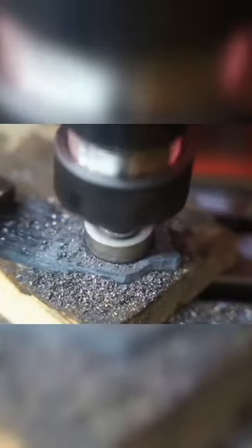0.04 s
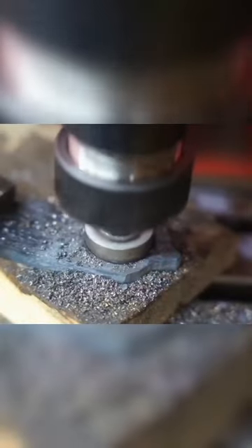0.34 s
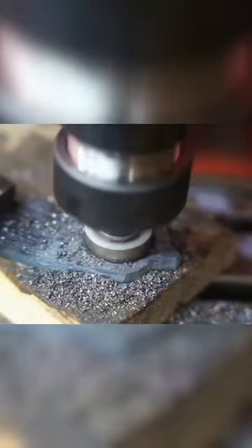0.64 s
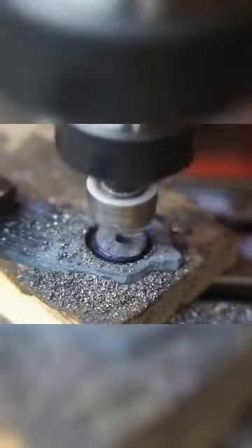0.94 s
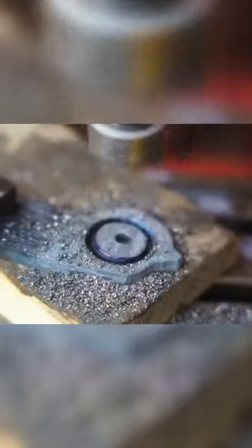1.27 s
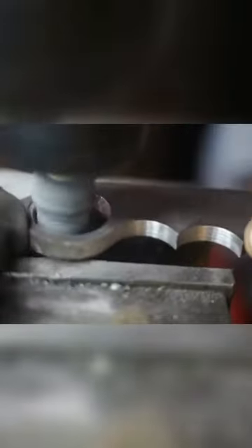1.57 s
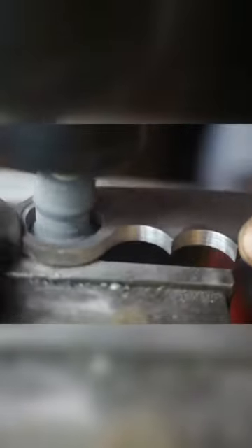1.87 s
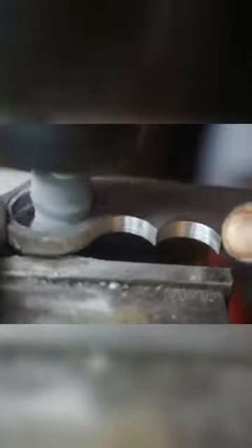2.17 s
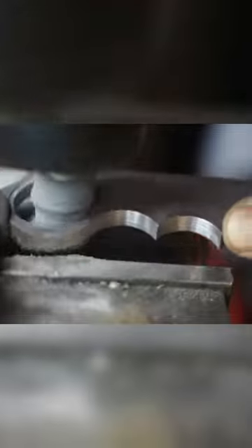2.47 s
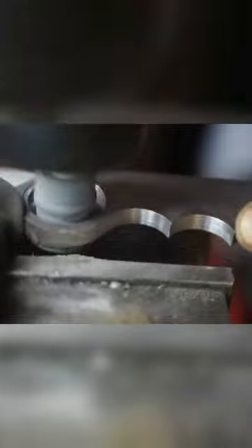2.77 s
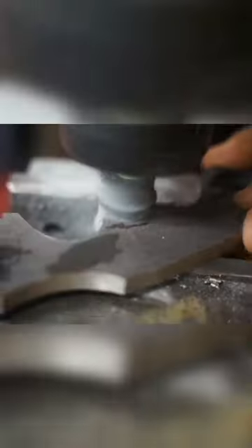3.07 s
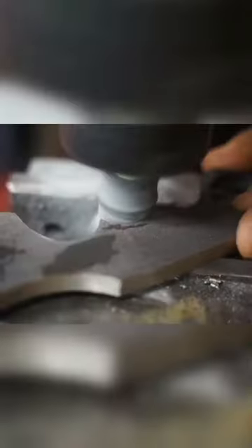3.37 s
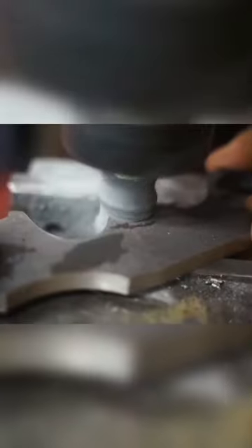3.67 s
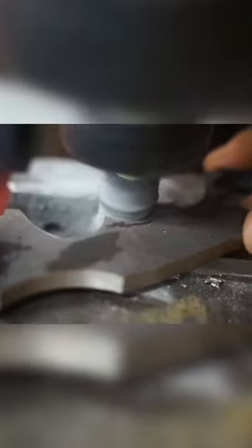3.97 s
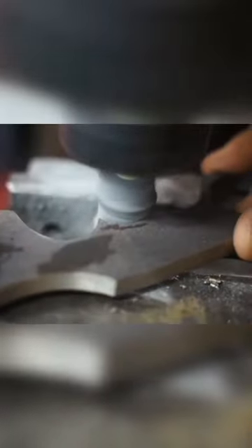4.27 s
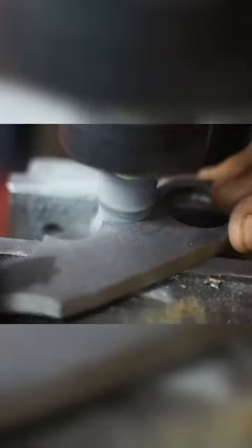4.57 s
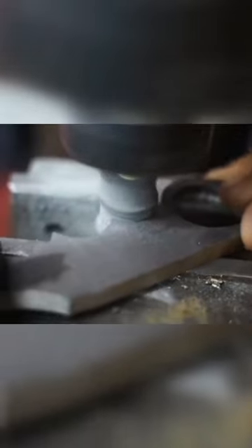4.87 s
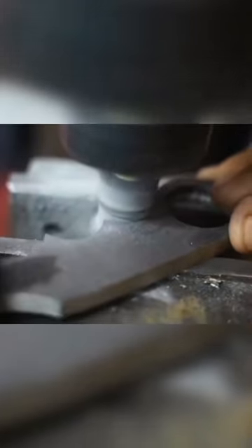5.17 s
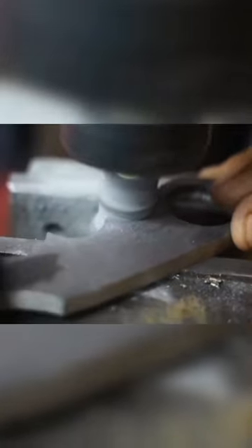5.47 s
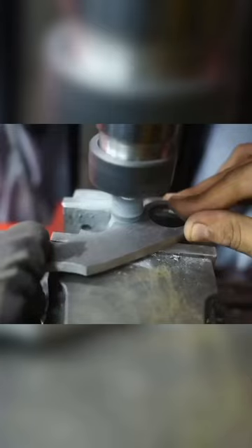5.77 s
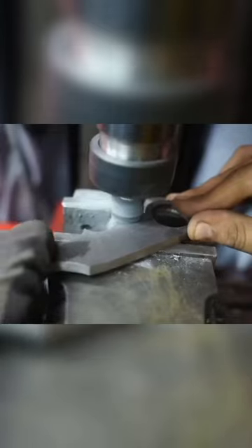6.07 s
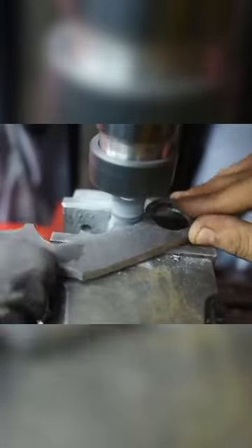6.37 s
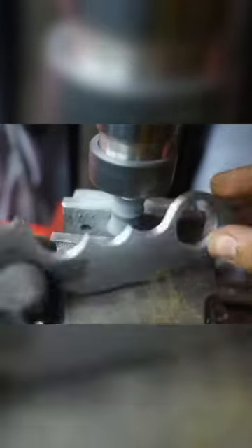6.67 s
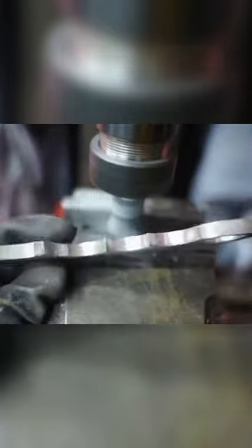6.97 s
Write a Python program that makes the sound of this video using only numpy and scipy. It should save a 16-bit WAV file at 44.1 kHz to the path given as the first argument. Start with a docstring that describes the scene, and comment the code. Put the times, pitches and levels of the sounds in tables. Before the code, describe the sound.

A hole saw grinds through steel and squeals free, then a sanding drum on a drill press rubs and chatters against a ringing blade.

```python
"""Hole saw and sanding drum

Close up at a drill press in a small shop. A hole saw squeaks, grinds through a steel blank and
squeals by stick-slip as it lifts; the press idles for a moment. Then a sanding drum grinds a blade's
edge: the steel sings under the grit and chatters as the drum's high spot strikes it once a turn."""
import sys
import numpy as np
from scipy import signal
from scipy.fft import rfft, irfft
from scipy.io import wavfile
from scipy.ndimage import uniform_filter1d

SR = 44100
rng = np.random.default_rng(int(sys.argv[2]) if len(sys.argv) > 2 else 0)


def file_out(sig):
    """Save sig as 16-bit WAV at sys.argv[1]."""
    # one column per channel
    cols = np.atleast_2d(sig).T
    # limit, then scale
    lim = np.clip(cols, -1, 1)
    pcm = np.round(lim * 32767).astype(np.int16)
    wavfile.write(sys.argv[1], SR, pcm)


N = 319284
T = np.arange(N) / SR

# Levels in the tables are relative; each layer sets its own gain.
# the saw's stick-slip in its groove:
# start/s, release/s, level at release/dB, swell/(dB/s), decay/(dB/s), f/Hz, sharp at first by/Hz
ENTRY_SQUEAK = (0, .012, -31, 0, 1200, 8785, 15)
LIFT_SQUEAL = (.944, .962, -30.5, 40, 175, 3975, 30)

# tone of the steady motor wash and of the press running free: f/Hz, level/dB
MOTOR_COLOUR = [(25, -3.5), (80, -11), (150, -4), (280, -4), (550, -4.5), (1100, -3), (3000, -7),
                (15000, -26.5)]
IDLE_COLOUR = [(25, -23), (100, -10.5), (280, 0), (520, -11), (1100, -16), (2600, -20), (3500, -39),
               (12300, -38.5), (15500, -38)]
# resonances of the idling press: f/Hz, width/Hz, level/dB
IDLE_MODES = [(1110, 93, -8.5), (1640, 60, -14), (2010, 51, -16), (4640, 150, -21)]
# the idle's rise between the jobs: t/s, level/dB
IDLE_ENVELOPE = [(.94, -58.5), (1.02, -55.5), (1.1, -63), (1.32, -57.5), (1.39, -53.5), (1.44, -55.5),
                 (1.58, -48.5)]

# the teeth bite into the blank: start/s, end/s, grind/dB, rumble/dB
BITES = [(.06, .2, -54.5, -50), (.22, .31, -39.5, -43.5), (.35, .435, -40.5, -41), (.47, .53, -42, -53),
         (.57, .71, -49.5, -49), (.74, .85, -49, -49), (.875, .905, -43, -46.5)]
# tone of the table's rumble, the blank's grind and the flying chips: f/Hz, level/dB
RUMBLE_COLOUR = [(20, -16), (70, -5.5), (140, -0.5), (290, 4.5), (450, -5), (700, -9.5), (1500, -61)]
GRIND_COLOUR = [(350, -11.5), (650, -13), (1250, -4.5), (2600, -10), (6000, -33)]
CHIP_COLOUR = [(1500, -16), (2800, -12), (3150, -1.5), (3750, -2), (4700, -6), (6500, -10), (11000, -12.5),
               (15500, -13.5)]
# resonances of the blank on its board, the saw's cup and the nearly freed disc: f/Hz, width/Hz, level/dB
BLANK_MODES = [(1050, 180, 1.5), (1700, 250, -3)]
CUP_MODES = [(3180, 110, -49), (3570, 150, -47.5), (4450, 170, -52), (6060, 96, -57)]
DISC_MODES = [(1530, 79, -52), (2310, 140, -48.5)]

# an edge snags; the work shifts on the table: t/s, level/dB, f/Hz, width/Hz, half length/s
EDGE_SNAGS = [(.128, -46.5, 3720, 450, 0.0079), (.175, -30.5, 3100, 400, .002),
              (.183, -40.5, 3800, 300, .005), (.493, -37.5, 3540, 180, 0.017), (.523, -35, 3300, 300, .008),
              (.585, -40.5, 5530, 500, 0.0088), (.625, -42, 3500, 150, .017),
              (.917, -37, 3220, 120, 0.0068), (.917, -33.5, 4080, 330, 0.0097),
              (.97, -44, 3230, 180, .0096), (1.254, -52, 10200, 2600, .003), (1.5, -57, 1700, 80, 0.032),
              (1.745, -34, 5430, 220, 0.006), (2.092, -34, 5480, 220, 0.008), (2.1, -37.5, 3790, 170, .022),
              (2.29, -51, 1110, 400, .025), (2.488, -29.5, 5490, 220, .006), (2.69, -50, 1120, 400, .035),
              (2.865, -32, 5520, 220, 0.004), (7.12, -49, 1150, 200, .035)]
TABLE_BUMPS = [(.13, -44, 250, 160, 0.018), (.79, -42.5, 131, 80, .035), (1.98, -53.5, 199, 160, 0.032),
               (3.11, -62, 180, 150, 0.037), (4.87, -62.5, 179, 161, 0.067)]
# steel touches steel: t/s, level/dB, f/Hz, t60/s, crack/dB
STEEL_TAPS = [(.687, -30, 3130, 0.018, -5), (.776, -32.5, 7600, .012, 5), (1.078, -32, 5510, 0.028, -14),
              (1.078, -42, 13250, 0.0088, 1), (1.251, -46, 3880, .02, -6), (1.548, -44, 3970, 0.019, 12.5),
              (1.566, -32.5, 5790, 0.037, 5.5), (1.572, -32.5, 2900, 0.026, -3)]
# tone of a tap's crack: f/Hz, level/dB
CRACK_COLOUR = [(150, -23), (1500, -1), (3500, 0.5), (5500, 4.5), (10500, -5.5), (15000, -16)]

# the hand leans the blade on the drum: t/s, level/dB
HAND_LEAN = [(1.6, -69), (1.68, -47), (3.45, -46), (3.66, -53.5), (4.1, -52.5), (5.79, -51), (6.22, -48.5),
             (6.36, -44.5), (7.24, -43)]
# extra pushes on top: t/s, half length/s, level/dB
HAND_PUSHES = [(1.686, 0.027, -46.5), (1.948, 0.15, -44.5), (2.298, 0.093, -46.5), (2.448, 0.029, -43),
               (2.685, 0.16, -47), (2.816, 0.025, -42.5), (3.024, 0.13, -45), (3.395, 0.023, -48),
               (3.902, 0.088, -55.5), (4.304, 0.29, -51), (4.886, 0.097, -47.5), (5.32, 0.15, -49),
               (5.55, 0.15, -45.5), (5.884, 0.047, -45.5), (5.974, 0.088, -44.5), (7.16, 0.067, -47.5)]
# spells of chatter on the high spot: start/s, end/s, knock/dB, chirp/dB
CHATTER_SPELLS = [(1.73, 1.77, -37.5, -57), (2.04, 2.11, -38.5, -56), (2.46, 2.52, -40.5, -51),
                  (2.8, 3.15, -42.5, -58), (3.26, 3.33, -38, -50), (3.48, 4.73, -36, -40.5),
                  (4.96, 5.27, -35.5, -44), (5.6, 5.83, -36, -45.5), (6.03, 6.27, -36.5, -45.5)]
# tone of the grit's rub, the table's groan, the high spot's knock, the blade's song: f/Hz, level/dB
RUB_COLOUR = [(30, -26), (120, -19.5), (230, -16), (450, -19), (750, -22), (1400, -10.5), (2000, 0),
              (3000, 5), (4200, -2), (9000, -9), (15500, -14.5)]
GROAN_COLOUR = [(500, -37), (900, -9), (1400, -15), (2500, -54)]
KNOCK_COLOUR = [(300, -56), (1200, -33), (2200, -31), (5000, 1), (7000, -3.5), (12500, -9), (15500, -9.5)]
SING_COLOUR = [(1000, -75), (2000, -57), (2700, -23), (5500, -33), (15000, -45)]
# resonances of those four layers and of the blade's finger ring: f/Hz, width/Hz, level/dB
RUB_MODES = [(1680, 105, -0.5), (2323, 130, 10), (3360, 63, 6), (3950, 96, -9), (4690, 76, 6),
             (5040, 250, 4.5)]
GROAN_MODES = [(1143, 110, -2.5), (1736, 152, 11.5)]
KNOCK_MODES = [(3090, 240, 2), (5450, 260, 6.5), (6370, 110, -6), (8250, 430, -0.5), (8700, 100, -2)]
SING_MODES = [(2641.5, 94.5, 3), (3274, 68, -8), (5110, 170, -28.5)]
FINGER_RING_MODES = [(2880, 230, -5), (3830, 120, -9.5), (5490, 150, -10)]
# overtones of the blade's stick-slip: harmonic number, level/dB
CHIRP_OVERTONES = [(2, -4), (3, 1), (4, -11)]
# the drum catches the blade hard: t/s, force/dB
HARD_CATCHES = [(2.347, -18), (3.113, -23), (3.167, -22.5), (3.309, -20), (3.426, -17), (4.01, -28),
                (4.298, -20), (4.674, -20.5), (4.783, -19.5), (4.936, -17.5)]
# the blade lands after bouncing clear for a turn: t/s
LANDINGS = [3.342, 3.665, 3.961, 4.162, 4.246, 4.279, 4.331, 4.602, 4.707, 4.78, 4.816, 5.768, 5.803, 5.836]


def amp(db):
    """Decibels to gain."""
    return np.exp(np.asarray(db) * np.log(10) / 20)


def unit(x):
    """Scales to rms 1."""
    return x / np.sqrt(np.mean(x ** 2) + 1e-20)


def held(start, end, rise, fall):
    """Envelope: a smooth attack up to start, a hold, a smooth release after end."""
    outside = np.maximum((start - T) / rise, (T - end) / fall)
    return np.exp(-np.clip(outside, 0, 6) ** 2)


def fader(rows, fade=0.014):
    """Rides the gain along (t/s, level/dB) points, fading out beyond them."""
    times, db = np.transpose(rows)
    return amp(np.interp(T, times, db)) * held(times[0], times[-1], fade, fade)


def spells(rows, rise, fall):
    """Two envelopes from rows of (start/s, end/s, level/dB, level/dB); overlaps add in power."""
    return [np.sqrt(sum((amp(row[column]) * held(row[0], row[1], rise, fall)) ** 2 for row in rows))
            for column in (2, 3)]


def wander(hz):
    """Smooth random modulation of rms 1, rolling off above hz."""
    rolloff = 1 + (np.fft.rfftfreq(N, 1 / SR) / hz) ** 4
    return unit(irfft(rfft(rng.standard_normal(N)) / rolloff, N))


def steadied(x, size=5000):
    """Keeps the fast grain of x but holds its slow level at 1."""
    power = uniform_filter1d(uniform_filter1d(x ** 2, size), size // 2)
    return x / np.sqrt(abs(power) + 1e-12)


def body(x, colour, modes=(), size=4096):
    """Plays x through a broad tone curve with resonances standing on it; comes out at rms 1."""
    hz = abs(np.fft.fftfreq(size, 1 / SR))
    points, db = np.transpose(colour)
    power = amp(np.interp(np.log(hz + 1), np.log(points), db)) ** 2
    for centre, width, mode_db in modes:
        detune = (hz ** 2 - centre ** 2) / (width * (hz + 1))
        power = power + amp(mode_db) ** 2 / (1 + detune ** 2) / (1 + (detune / 8) ** 2)
    log_gain = np.log(power + 1e-10) / 2
    response = np.fft.ifft(np.exp(np.conj(signal.hilbert(log_gain)))).real  # minimum phase: no pre-ring
    return unit(signal.oaconvolve(x, response[:size // 2])[:N])


def grit(spread_db):
    """A dense stream of tiny scratches of uneven size."""
    return unit(rng.standard_normal(N) * amp(spread_db * wander(2350)))


def ringing(drive, modes, flicker_db, flicker_hz):
    """Friction excites each mode on its own, so they take turns in standing out."""
    out = np.zeros(N)
    for hz, width, db in modes:
        mode = signal.lfilter(*signal.iirpeak(hz, hz / width, SR), drive * rng.standard_normal(N))
        out += amp(db) * steadied(mode * amp(flicker_db * wander(flicker_hz)), size=8000)
    return out


def saw_squeal(row, rough, flutter_hz, overtone_db, catch_s=0.0093, settle_s=0.024):
    """The saw's cup rings by stick-slip: rough while gripped hard, thin and pure as it comes free."""
    start, release, db, swell, decay, hz, sharp_hz = row
    gain = amp(db - swell * np.maximum(release - T, 0) - decay * np.maximum(T - release, 0))
    gain *= held(start, T[-1], catch_s, catch_s)
    pitch = hz + sharp_hz * np.exp(-np.maximum(T - start, 0) / settle_s)
    shake = rough * (gain / gain.max()) ** .4
    phase = 2 * np.pi * np.cumsum(pitch) / SR + .75 * shake * wander(flutter_hz)
    grip = steadied(1 + shake * wander(flutter_hz), size=1800)
    overtone = amp(overtone_db) * shake * np.sin(2 * phase + shake * wander(2 * flutter_hz))
    return np.sqrt(2) * gain * grip * (np.sin(phase) + overtone)


def drill_press():
    """Motor and belt: up front between the jobs, a low wash under the work."""
    idle = steadied(body(grit(2.8) * amp(2.2 * wander(67)), IDLE_COLOUR, IDLE_MODES))
    wash = body(grit(0.68), MOTOR_COLOUR)
    return idle * fader(IDLE_ENVELOPE) * amp(2.5) + wash * amp(-62.5)


def hole_saw(start_s=0.3, disc_loose_s=0.65, end_s=0.912, rise_s=0.11, fall_s=0.025):
    """Teeth catch unevenly: the table rumbles, the blank grinds, chips hiss, cup and disc ring."""
    bite = amp(1.93 * wander(22))
    teeth = amp(1.6 * wander(200))
    cutting = held(start_s, end_s, rise_s, fall_s)
    loose = cutting * held(disc_loose_s, end_s, rise_s, fall_s)
    biting, shaking = spells(BITES, rise=0.022, fall=0.017)
    grinding = np.maximum(biting, cutting * amp(-48.5))  # steady feed under the bites
    flying = cutting * (grinding / amp(-41)) ** 0.31  # a little more spray in the hard bites
    rumble = steadied(body(bite * grit(0.99), RUMBLE_COLOUR)) * shaking * amp(-2.0)
    grind = steadied(body(bite * teeth * grit(0.98), GRIND_COLOUR, BLANK_MODES)) * grinding * amp(0.5)
    chips = steadied(body(bite * teeth * grit(1.6), CHIP_COLOUR)) * flying * amp(-41)
    cup = ringing(teeth, CUP_MODES, flicker_db=4, flicker_hz=22) * flying
    disc = ringing(teeth, DISC_MODES, flicker_db=3, flicker_hz=22) * loose
    return rumble + grind + chips + cup + disc


def friction_swells(rows):
    """Snags and bumps: short swells of friction, each ringing one resonance."""
    out = np.zeros(N)
    for s, db, hz, width, half in rows:
        near = abs(T - s) < 4 * half
        band = signal.butter(2, [max(hz - width / 2, 20), hz + width / 2], "bandpass", fs=SR, output="sos")
        ring = signal.sosfilt(band, rng.standard_normal(SR))[-near.sum():]
        shape = np.exp(-.5 * ((T[near] - s) / half) ** 2)
        out[near] += amp(db) * unit(ring * shape) * np.sqrt(np.mean(shape ** 2))
    return out


def shop_reflections(x, t60=0.1, wet_db=-13, size=12000):
    """Adds a tight, diffuse room: bounces off the table, the column and the walls."""
    age = np.arange(size) / SR
    tail = rng.standard_normal(size) * (age > .004) * amp(-60 * age / t60)
    return x + amp(wet_db) * signal.oaconvolve(x, tail / np.linalg.norm(tail))[:N]


def steel_taps():
    """Each touch of steel on steel is a short crack and one ringing mode."""
    out = np.zeros(N)
    noise = body(rng.standard_normal(N), CRACK_COLOUR)
    for s, db, hz, t60, crack_db in STEEL_TAPS:
        age = np.maximum(T - s, 0)
        attack = 1 - np.exp(-age / 0.00013)
        ring = amp(-60 * age / t60) * np.sin(2 * np.pi * hz * age)
        crack = 0.43 * amp(crack_db) * noise * np.exp(-age / 0.0064)
        out += amp(db) * attack * (ring + crack)
    return out


def hand_pressure():
    """The hand's weight on the blade as a gain: a slow lean with pushes on top."""
    push_power = sum((amp(db) * held(s, s, half, half)) ** 2 for s, half, db in HAND_PUSHES)
    return np.sqrt(fader(HAND_LEAN) ** 2 + push_power)


def sanding_drum(start_s=1.66, leave_ring_s=3.16):
    """Grit rubs the blade's edge and the high spot hammers it; both make the steel sing."""
    on_drum = held(start_s, T[-1], 0.018, 0.018)
    in_ring = held(0, leave_ring_s, 0.055, 0.055)  # the drum works inside the finger ring
    blows, touching = high_spot()
    pressure = unit(amp(1.2 * wander(82) + 1.36 * wander(8.3))) * touching
    rubbing = hand_pressure()
    chatter, chirping = spells(CHATTER_SPELLS, rise=0.058, fall=0.069)
    knocking = on_drum * np.hypot(chatter, amp(-50))  # a light knock stays between spells
    rub = steadied(body(pressure * grit(2.1), RUB_COLOUR, RUB_MODES)) * rubbing * amp(9.5)
    groan = steadied(body(pressure * grit(4.8), GROAN_COLOUR, GROAN_MODES))
    groan *= rubbing ** 2 * amp(44.0 + 1.95 * wander(20))  # the table answers only to firm pressure
    scraping = blows + 0.53 * touching  # grit still scrapes between blows
    knock_modes = KNOCK_MODES + [(14140, 110, -2)]  # a thin ring on top
    knock = steadied(body(scraping * grit(3.1), KNOCK_COLOUR, knock_modes)) * knocking * amp(-0.5)
    chirps = edge_chirps(blows) * chirping
    finger_ring = ringing(scraping, FINGER_RING_MODES, flicker_db=4.5, flicker_hz=30)
    finger_ring *= (knocking + rubbing) * in_ring
    blow_share = knocking ** 2 / (knocking ** 2 + (3.0 * rubbing) ** 2 + 1e-18)
    contact = np.sqrt(blow_share * (blows + 0.48 * touching) ** 2 + (1 - blow_share) * pressure ** 2)
    # the song grows with pressure and is damped while the drum is in the ring
    singing = on_drum * amp(-29 - 3 * in_ring) * (rubbing / amp(-44.5)) ** 0.43
    return rub + groan + knock + chirps + finger_ring + blade_song(contact) * singing


def spindle_turns(turns_per_s=58.4):
    """Turns made so far: near steady speed, with a whole number of turns between landings."""
    times = np.concatenate([[0], LANDINGS, [T[-1]]])
    whole_turns = np.round(np.diff(times, prepend=0) * turns_per_s)
    return np.interp(T, times, np.cumsum(whole_turns))


def high_spot(jitter_s=0.00037, spread_db=0.5):
    """One brief blow a turn; after bouncing clear for a turn, the blade lands with a longer one."""
    turns = spindle_turns()
    turn = np.round(turns).astype(int)
    late, force, stretch = rng.standard_normal((turn[-1] + 1, 3)).T
    landing = np.isin(np.arange(len(late)), np.round(np.interp(LANDINGS, T, turns)))
    skipped = np.roll(landing, -1)
    strength = amp(spread_db * force - 20 * skipped)
    offset_s = (turns - turn) / 58.4 - jitter_s * late[turn]  # 58.4 turns a second
    span_s = np.where(offset_s < 0, .002, .0023)  # attack, release
    span_s *= np.exp(.18 * stretch[turn] + .45 * landing[turn] * (offset_s > 0))
    blows = strength[turn] * np.exp(-.5 * abs(offset_s / span_s) ** 1.5)
    touching = 1 - .3 * uniform_filter1d(skipped[turn].astype(float), size=200)  # a bounce eases the rub
    return unit(blows), touching


def blade_song(contact):
    """Grit drives the blade, ruled by one mode; the drum damps its widest swings."""
    swing = steadied(body(contact * grit(3.2), SING_COLOUR, SING_MODES), size=3000)
    envelope = abs(signal.hilbert(swing))
    return swing / (1 + (envelope / 2.6) ** 4) ** .25


def edge_chirps(blows, slip_hz=2688):
    """The edge sticks and slips at the height of a blow; each overtone flickers on its own."""
    pitch = slip_hz * (1 + .007 * wander(59.3))
    phase = 2 * np.pi * np.cumsum(pitch) / SR + 0.35 * wander(290)
    overtones = sum(amp(db + 3 * wander(35)) * np.sin(round(k) * phase) for k, db in CHIRP_OVERTONES)
    return steadied(blows * overtones)


def hard_catches(half_s=0.0041, crack_db=-15.5):
    """A hard catch on the drum cracks and sets the blade's main mode ringing."""
    contact = sum(amp(db) * held(s, s, half_s, half_s) for s, db in HARD_CATCHES)
    hz, width, _ = SING_MODES[0]
    pole = np.exp(-np.pi * width / SR)
    ring = signal.lfilter([1 - pole], [1, -pole], contact) * np.sin(2 * np.pi * hz * T)
    crack = contact * body(rng.standard_normal(N), KNOCK_COLOUR, KNOCK_MODES)
    return ring + amp(crack_db) * crack


def scene():
    """The cut, the pause and the sanding, mixed in mono."""
    squeak = saw_squeal(ENTRY_SQUEAK, rough=0.63, flutter_hz=178, overtone_db=-60)
    lift = saw_squeal(LIFT_SQUEAL, rough=0.8, flutter_hz=140, overtone_db=-18.5)
    lift *= amp(-12 * (1 - held(0, 1.066, .014, .014)))  # the ring drops as the saw clears the groove
    steel = steel_taps() + friction_swells(EDGE_SNAGS) + sanding_drum() + hard_catches()
    machine = hole_saw() + squeak + lift + drill_press() + friction_swells(TABLE_BUMPS)
    return (machine + shop_reflections(steel))[None]


def record(dry):
    """A steep high cut at 15.6 kHz takes off the very top."""
    high_cut = signal.firwin(511, 15600, window=("kaiser", 9), fs=SR)
    return signal.oaconvolve(dry, high_cut[None], "same")


dry = scene()
out = record(dry)
file_out(out)
```